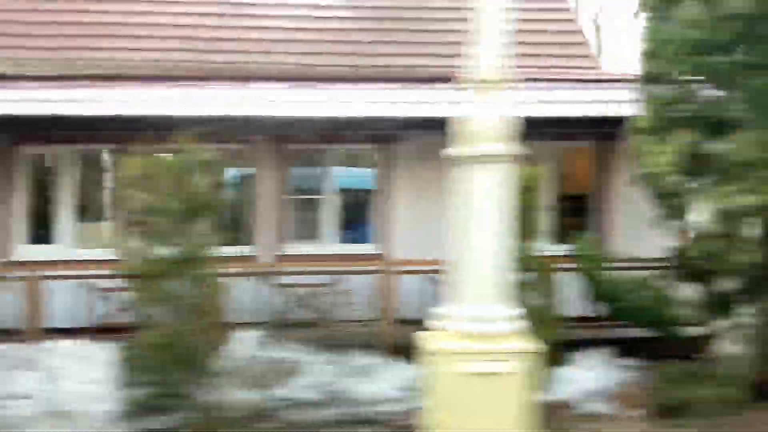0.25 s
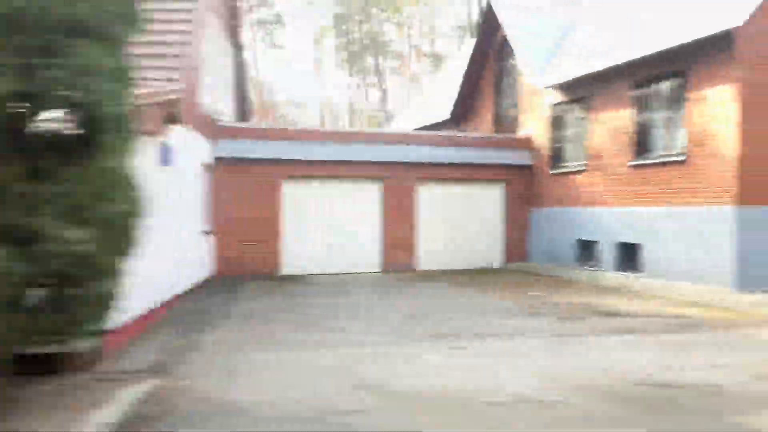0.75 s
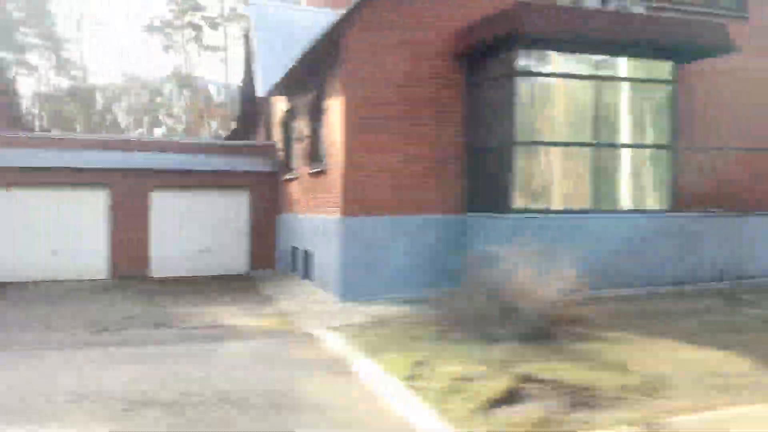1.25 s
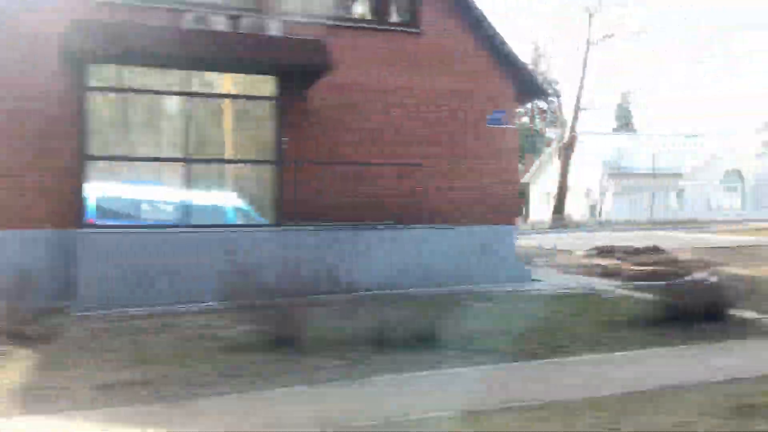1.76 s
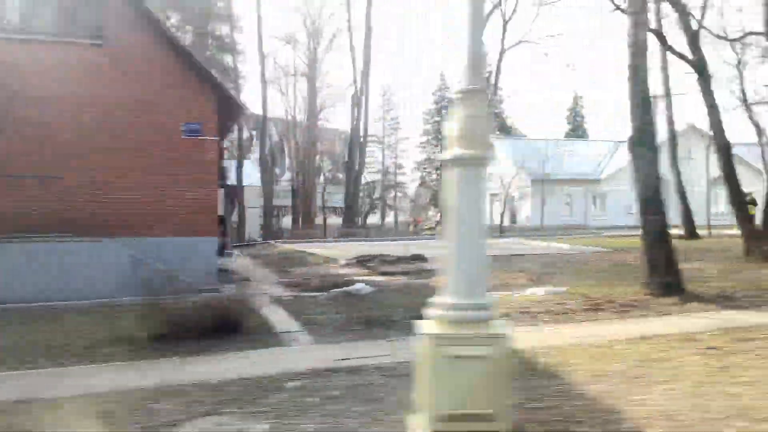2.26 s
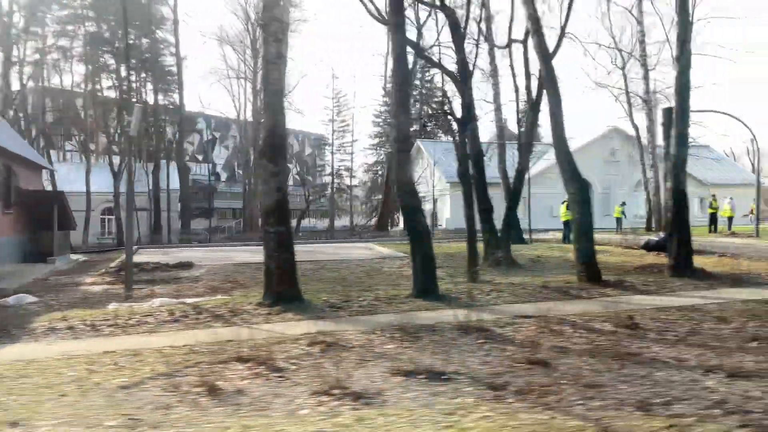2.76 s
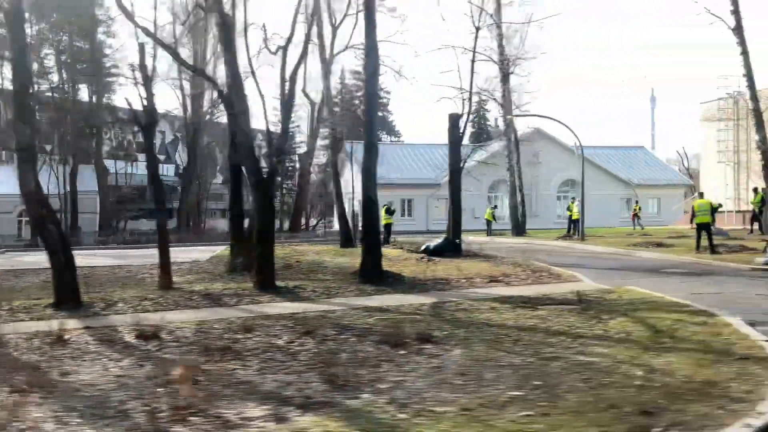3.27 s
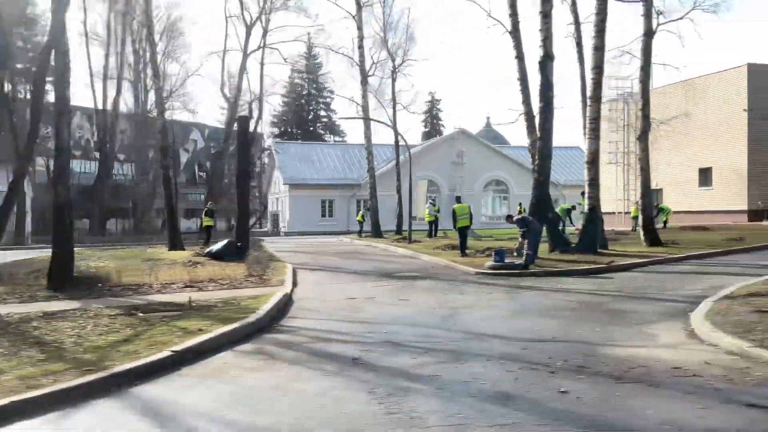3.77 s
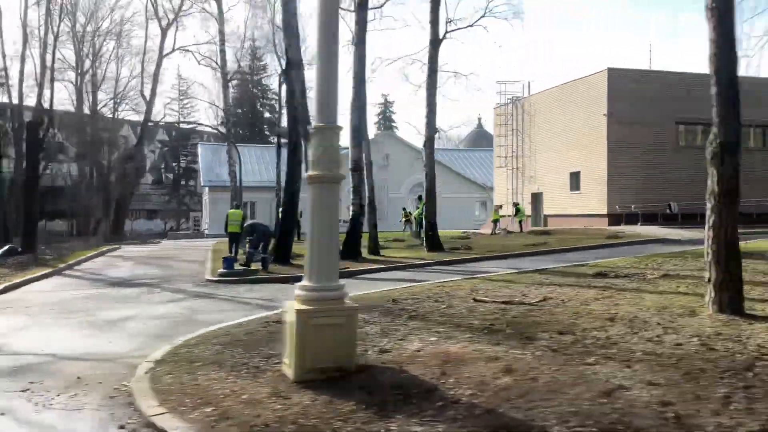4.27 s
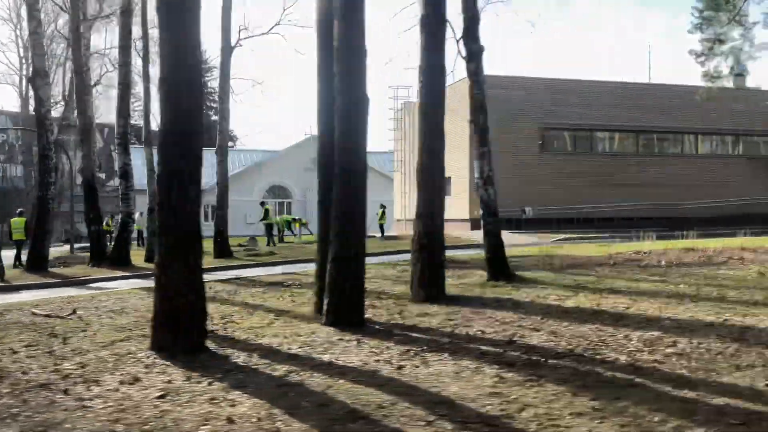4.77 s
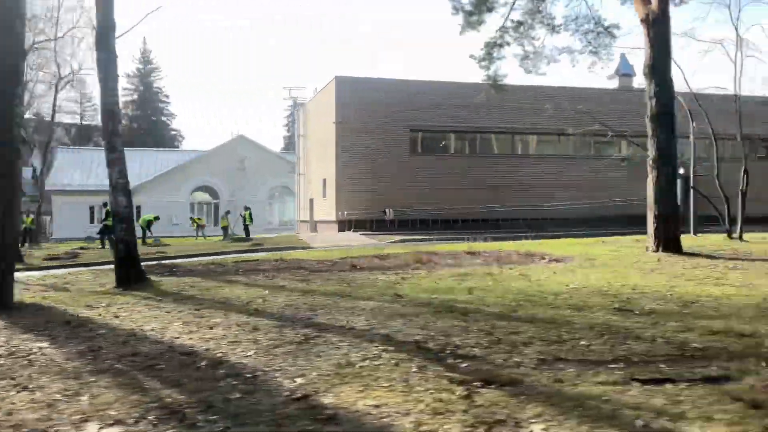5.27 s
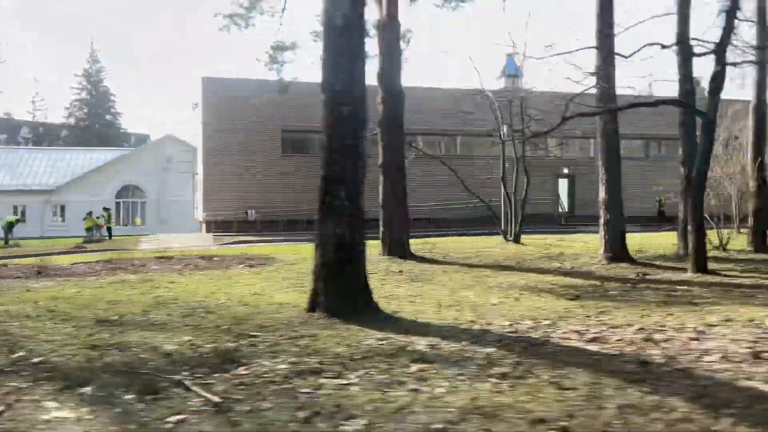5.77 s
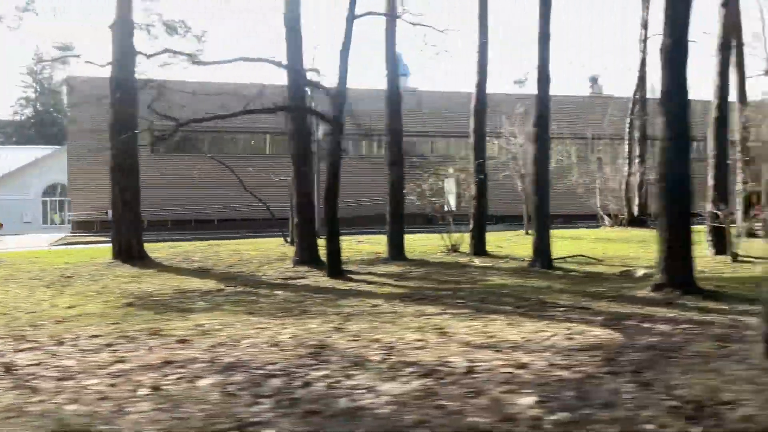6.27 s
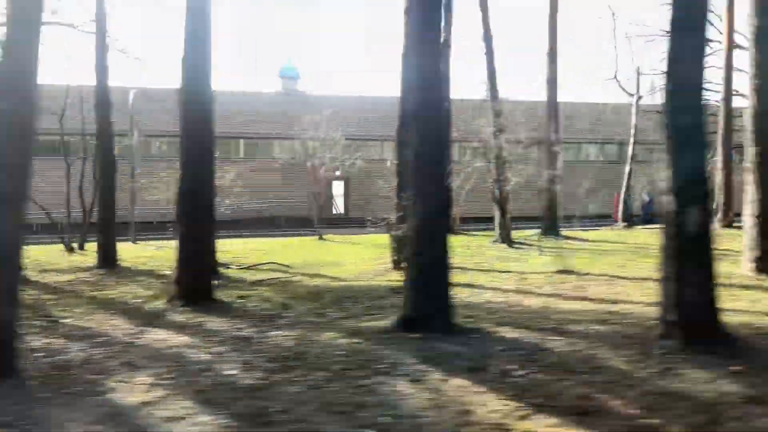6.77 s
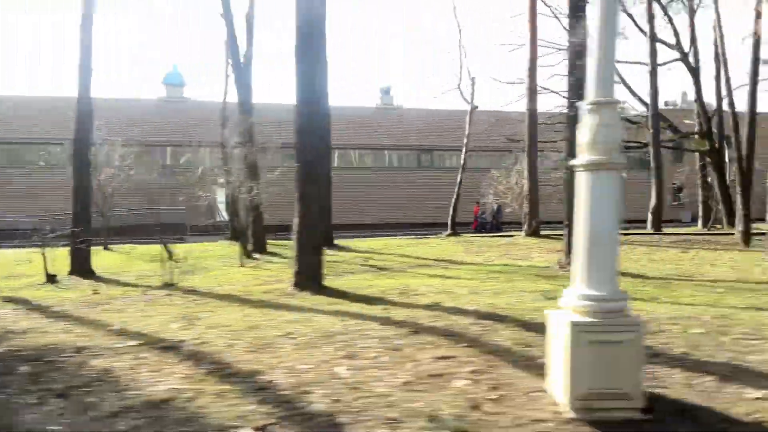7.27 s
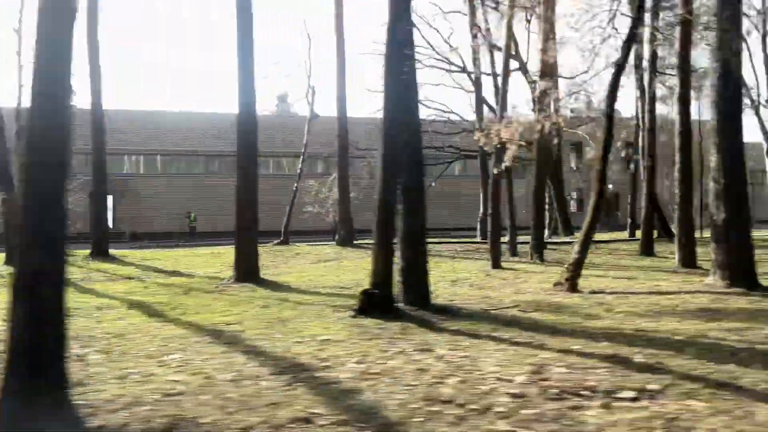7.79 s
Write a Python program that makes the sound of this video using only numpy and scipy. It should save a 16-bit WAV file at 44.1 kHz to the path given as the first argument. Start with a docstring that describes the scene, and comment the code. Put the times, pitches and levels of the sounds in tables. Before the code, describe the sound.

A handheld phone microphone in a bus cabin picks up continuous bassy rumble, a droning hum and a dull, faintly singing roar with very faint hiss. Small jolts thump in the first three seconds. Ticks thicken after four seconds, leading to hard bumps and a loose object knocking against a panel. Then a slight squeak and metal rattle, and smoother, softer rolling as the bus slows.

```python
"""Inside a slowing bus

A bus rolls along a quiet road, losing speed, heard by a phone held near a side window. Road roughness booms in
the body as shaped noise, bumps jolt it as short unsteady tones, and the driveline hums on multiples of the shaft
rate. Tyres and air roar as flickering noise with panels resonating in it, under a steady hiss. Trim ticks, rustles
and squeaks; a loose object knocks and bounces, and a metal fitting chatters, both as struck modes and noise.
"""
import sys
import numpy as np
from scipy import signal
from scipy.fft import rfft, irfft, next_fast_len
from scipy.io import wavfile

SR = 44100
rng = np.random.default_rng(int(sys.argv[2]) if len(sys.argv) > 2 else 0)


def int16_out(signal):
    """Quantize to a 16-bit WAV file."""
    q = np.round(np.clip(np.atleast_2d(signal).T, -1, 1) * 32767)
    wavfile.write(sys.argv[1], SR, q.astype(np.int16))


N = 354123
M = next_fast_len(N)
FREQ = np.arange(M // 2 + 1) * SR / M
TIME = np.arange(N) / SR
AFTER = np.arange(SR // 3) / SR  # time since a blow, s
PORT_LAG_S = 24 / 44100  # sound reaches the left microphone port this much later
TRIM_LEAD_S = 23 / 44100  # ticks and knocks reach the left port this much earlier


def undb(db):
    """Gain of a level in dB."""
    return 10 ** (np.asarray(db) / 20)


def columns(table):
    """Curve rows joined by straight lines over time, one array a column."""
    s, *cols = np.transpose(table)
    return [np.interp(TIME, s, c) for c in cols]


def unit(x):
    """Scale so that the mean of both channels has rms 1."""
    return x / np.sqrt(np.mean(x.mean(axis=0) ** 2))


def power(spectrum):
    """Energy of the mean of both channels."""
    return np.sum(np.abs(spectrum.mean(axis=0)) ** 2)


def walk(rate):
    """Random levels of spread 1 met every 1 / rate s and joined smoothly."""
    knots = rng.standard_normal(int(N / SR * rate) + 3)
    k, part = np.divmod(TIME * rate, 1)
    k = k.astype(int)
    ease = (1 - np.cos(np.pi * part)) / 2
    return knots[k] * (1 - ease) + knots[k + 1] * ease


def noise(grain_db=0., size=100):
    """Spectra of two unrelated noises; grain makes their shared level jump every `size` samples."""
    level_db = grain_db * rng.standard_normal(M // size + 1)
    return rfft(rng.standard_normal((2, M)) * undb(level_db).repeat(size)[:M])


def field(colour, lag_s, drive):
    """Coloured noise at both ports: the left hears the right's sound delayed, mixed with sound of its own."""
    hz, *cols = np.transpose(colour)
    db, pan_db, like, turn = (np.interp(np.log(FREQ + 1), np.log(hz), c) for c in cols)
    like = np.clip(like, 0, 1)
    shared, own = drive
    gain = undb(db) * (FREQ > hz[0]) * (FREQ < hz[-1])
    late = shared * np.exp(-1j * (2 * np.pi * FREQ * lag_s + turn))
    left = undb(pan_db) * (np.sqrt(like) * late + np.sqrt(1 - like) * own)
    return gain * np.array([left, shared])


def flicker(spectrum, lo_hz, count, slow_db, quick_db, rate, tilt_db=0.):
    """Half-octave bands, each wandering slowly and quickly on its own; tilt is in dB per octave."""
    out = 0
    for octave in np.arange(count) / 2:
        band = np.cos(np.pi * np.clip(np.log2(FREQ / lo_hz + 1e-9) - octave, -.5, .5)) ** 2
        # the tilt turns a quarter octave above the middle band
        db = slow_db * walk(1) + quick_db * walk(rate) + tilt_db * (octave - count / 4)
        out = out + irfft(spectrum * band, M)[:, :N] * undb(db)
    return unit(out)


def ring(hz, t60):
    """A dying sine that takes about a cycle to build up."""
    decay = np.exp(-np.log(1000) * AFTER / t60)
    return np.sin(2 * np.pi * hz * AFTER) * decay * (1 - np.exp(-AFTER * hz))


def clatter(hz, width, t60):
    """A dying burst of noise around one pitch, partly different at the two ports."""
    band = signal.butter(2, [hz - width / 2, hz + width / 2], "band", fs=SR, output="sos")
    both, apart = signal.sosfilt(band, rng.standard_normal((2, len(AFTER))))
    sides = np.array([both + 0.88 * apart, both - 0.78 * apart]) / (2 * both.std())
    return sides * np.exp(-np.log(1000) * AFTER / t60)


def add(out, s, sound, pan_db, lead_s=0):
    """Place a short sound at both ports; with a lead the left is early and their mean keeps the sound's peak."""
    pair = undb([[pan_db / 2], [-pan_db / 2]]) * sound
    pair[1] = np.roll(pair[1], round(lead_s * SR))
    if lead_s:
        pair *= np.abs(sound).max() / np.abs(pair.mean(axis=0)).max()
    i = int((s - lead_s) * SR)
    out[:, i:i + pair.shape[1]] += pair[:, :N - i]


def road():
    """The rough surface shakes floor, sides and roof, each booming in its own range."""
    # roughness of the surface: start_s, roughness_db
    roughness = [(0, -24.5), (.35, -30.5), (1, -21.5), (1.5, -26.5), (2, -28), (3, -30), (3.7, -30),
                 (4.3, -25), (4.7, -23), (5.05, -25), (5.55, -21), (5.66, -28.5), (6, -30.5), (6.5, -33.5),
                 (7.2, -31), (8.03, -35)]
    # booms of floor, sides and roof, each: pitch_hz, right_db_per_hz (relative), left_minus_right_db,
    # likeness (0-1), left_lag_rad (beyond the port spacing)
    floor_boom = [(15, -42, 1, .95, 0.0059), (30.2, -14.5, 0, 1, 0), (44.8, -7, -2, 0.87, 0),
                  (65.6, 0.5, 0, 0.6, 0.0015), (85, -8, -1.5, 0.2, 0), (99, -30.5, 2, 0.3, 0.0031)]
    side_boom = [(65.4, -23.5, 0, 0.3, 0.0031), (77.6, -6.5, -0.69, 0.24, 0.00023),
                 (97.5, -0.5, -0.097, 0.17, 0), (111.7, -8, 0.86, 0.77, 0), (143, -27, 0.99, 0.52, 0)]
    roof_rumble = [(111, -28, 3.5, .4, 0.0075), (125.5, -2.5, 5.5, 0.21, 0.012), (147, -1, -5, 0.62, 0.18),
                   (166, -6, 0, 0.99, 0.099), (205.5, -10, -3.5, 0.18, 0.037), (260.3, -3, -7, 0.17, 0.004),
                   (315.8, -14, 4.5, 0.081, 0.19), (317, -20, -1, 0.092, 0.1), (378, -27, -3, .1, 0.024)]
    # answer of floor, sides and roof: level_db (re mean roughness), follow_db_per_db, wander_db
    answers = [(-4, 0.64, 2), (-1.7, 0.94, 2), (-3.5, 0.55, 2.5)]
    mean_db = -28
    rough_db, = columns(roughness)
    out = 0
    for colour, (db, follow, wander_db) in zip((floor_boom, side_boom, roof_rumble), answers):
        # the analytic signal gives the envelope of the swing
        swing = np.fft.ifft(field(colour, PORT_LAG_S, noise()), M)[:, :N]
        # a ringing body swings more evenly than raw noise
        swing = swing / (np.abs(swing).mean(axis=0) + .3 * np.std(swing)) ** .45
        level_db = mean_db + db + follow * (rough_db - mean_db) + wander_db * walk(8)
        out = out + unit(swing.real) * undb(level_db)
    return out


def jolts():
    """Bumps under the wheels throw floor and side panels, each on one low pitch that is never quite steady."""
    # bumps: centre_s, length_s, floor_peak_db, side_peak_db
    bumps = [(0.063, 0.14, -40, -26), (0.546, 0.043, -29, -24), (0.82, 0.089, -31, -21),
             (1.044, 0.036, -17, -15.5), (1.279, 0.11, -38, -16.5), (1.452, 0.046, -19, -17),
             (1.844, 0.12, -42, -21), (2.347, 0.067, -26, -38), (2.666, 0.046, -37, -19.5),
             (2.738, 0.044, -19, -31), (3.195, 0.055, -38, -21.5), (4.178, 0.07, -25, -29),
             (4.857, 0.093, -29, -12.5), (4.923, 0.12, -22.5, -34), (4.694, 0.086, -30, -20.5),
             (5.176, 0.06, -21, -17.5), (5.276, 0.093, -19, -23), (5.443, 0.049, -15.5, -16),
             (5.495, 0.035, -10, -17.5), (5.342, 0.096, -24, -35), (5.055, 0.11, -23, -35),
             (5.56, 0.037, -21, -19), (6.095, 0.076, -24.5, -24.5), (7.187, 0.099, -39, -25)]
    # ringing of floor and sides: pitch_hz, pitch_wander (share), left_lag_rad, lag_wander_rad
    jolt_tones = [(60, 0.13, 0.2, 0.25), (95.2, 0.0704, 0.3, 0.58)]
    centres, lengths, *peaks = np.transpose(bumps)
    out = 0
    for peaks_db, (hz, wander, lag, lag_wander) in zip(peaks, jolt_tones):
        gain = sum(swell(s, length, db) for s, length, db in zip(centres, lengths, peaks_db))
        phase = 2 * np.pi * (np.cumsum(hz * (1 + wander * walk(14))) / SR + rng.random())
        out = out + gain * np.sin([phase - lag - lag_wander * walk(6), phase])
    return out


def swell(s, length, db):
    """Gain of one jolt centred on s: it rises, holds and falls."""
    edge_s = 0.018
    inside = np.clip((length / 2 - np.abs(TIME - s)) / edge_s + .5, 0, 1)
    return undb(db) * np.sin(np.pi / 2 * inside) ** 2


def driveline():
    """Engine and driveline hum on multiples (orders) of the shaft rate, wavering in level and a little in phase."""
    # orders with a level curve each: start_s, hum_hz (11 times the shaft rate), then hum_db, order_8_db,
    # order_33_db, order_4_db, order_16_db, order_7_db
    shaft = [(0, 273.2, -33.5, -43.5, -65, -31.5, -48, -49), (1, 271, -32, -39, -65, -34.5, -45, -47.5),
             (2, 268.9, -30, -39.5, -65, -30, -47.5, -44.5), (3, 265.5, -33, -43, -53, -31.5, -54.5, -46.5),
             (4, 264.1, -34, -41.5, -54.5, -34.5, -52, -42.5), (5, 262.8, -33, -42.5, -56.5, -33, -60, -45),
             (5.4, 262.2, -37.5, -36.5, -61, -39, -57, -42),
             (5.52, 260.7, -30.5, -42.5, -51, -33.5, -52, -49),
             (6.2, 259.4, -35, -38.5, -47, -41.5, -58, -51), (7, 256.7, -37, -41.5, -47.5, -38, -55, -49),
             (8.03, 254.1, -40, -34.5, -46.5, -46, -59, -47)]
    # stereo of those six, in that order: left_minus_right_db, left_lag_rad
    curve_sides = [(-6, 0.24), (3, 2), (-7.5, 3.5), (3, 0.1), (-3.5, 2), (2, 1.3)]
    # level waver of those six: waver_db
    curve_waver = [1.9, 2.2, .6, 2, 1.1, 2]
    # orders whose level changes evenly: order, start_db, change_db_per_s, left_minus_right_db, left_lag_rad
    even = [(1.992, -42, 0, -1, 0.05), (6.04, -42, 0, 3.5, 0.55), (12, -45.5, 0, 5, 1.0),
            (23.18, -51.5, -1.5, -10, 2.9), (27.62, -56.5, -1, -4.5, 3.5)]
    even_waver_db = 2
    hum_hz, *curves_db = columns(shaft)
    turns = 2 * np.pi * np.cumsum(hum_hz / 11) / SR
    lines = [(order, db, waver_db, *side)
             for order, db, waver_db, side in zip((11, 8, 33, 4, 16, 7), curves_db, curve_waver, curve_sides)]
    lines += [(order, db + slope_db * TIME, even_waver_db, *side) for order, db, slope_db, *side in even]
    out = 0
    for order, db, waver_db, pan_db, lag in lines:
        phase = order * turns + 2 * np.pi * rng.random() + 0.42 * walk(5)
        sides = np.array([undb(pan_db / 2) * np.sin(phase - lag), undb(-pan_db / 2) * np.sin(phase)])
        out = out + unit(sides) * undb(db + waver_db * walk(7))
    return out


def roar():
    """Tyre and air noise comes through the cabin, with panel resonances singing in it."""
    # course of the roar: start_s, level_db, brightness_db_per_octave
    course = [(0, -39, 1), (.8, -39, 1.24), (2, -39, 1.5), (3, -39, 1.9), (3.8, -39.5, 1.2),
              (4.3, -40, 0.5), (4.9, -40.5, -0.95), (5.4, -38.5, -0.6), (5.8, -40.5, 1), (7, -40.5, 1.04),
              (8.03, -40.5, 1)]
    # cabin colour: pitch_hz, right_db_per_hz (relative), left_minus_right_db, likeness (0-1),
    # left_lag_rad (beyond the port spacing)
    cabin = [(266, -30.5, -8, .2, 0), (340.5, 1, -4, 0.36, 1.1), (390, 2.5, -9.5, 0.41, 0.52),
             (513, 2, -6, 0.2, 0.72), (594, 2, -8, 0.5, 1.5), (793, 0.5, -5, 0.81, 0.89),
             (899, -13.5, -4, 0.27, 0.5), (970, -20.5, 5, .2, 0.72), (1330, -15.5, -5.5, 0.11, 0.15),
             (1780, -15.5, -1.5, 0.14, -0.93), (2020, -24, -0.5, 0.054, 0.55),
             (2966, -22.5, -1.5, 0.11, -0.92), (3930, -35.5, -2.5, 0.21, 0.54), (4500, -42.5, 4, .3, 0.55)]
    # panels: pitch_hz, width_hz (at half amplitude), level_db (re cabin noise), left_minus_right_db,
    # left_lag_rad (beyond the port spacing)
    panels = [(440.5, 20, -9, -14, 1.2), (579.6, 18, -17, -1, 2), (675.3, 21, -13, -10.5, 0.22),
              (1300, 51, -29, -5.5, 0), (1607, 314, -14.5, -8.5, -0.52), (1604, 90, -25, -7, -0.2),
              (1779, 110, -25.5, -6, -0.51), (2145, 37, -29.5, -2, -0.19), (2240, 65, -28.5, -6.5, -0.078),
              (3080, 44, -29.5, -2.5, 0.6), (3458, 110, -22.5, -2.5, -0.14), (3550, 70, -30.5, -3, -0.2),
              (3753, 140, -26, -1, 0.19), (3900, 91, -36.5, 2, 0), (4080, 82, -35.5, -4, -0.77)]
    # the low panels quieten as speed falls
    fade_below_hz, fade_start_s, fade_length_s, fade_db = 700, 4.5, 1, -5
    level_db, tilt_db = columns(course)
    broad = field(cabin, PORT_LAG_S, noise())
    # grit on the road makes the drive of the panels a little grainy; same columns as the cabin colour
    grit_colour = [(200, 0.0016, 0.0016, 0.76, 0.0016), (6000, 0.0029, 0.0079, 0.82, 0.0044)]
    grit = field(grit_colour, PORT_LAG_S, noise(grain_db=2.0))
    total = broad / np.sqrt(power(broad))
    low = np.zeros_like(broad)
    for hz, width, db, pan_db, turn in panels:
        near = np.abs(FREQ - hz) < 4 * width
        resonance = 1 / (1 + 1j * (FREQ[near] - hz) / (width / 2)) ** 2
        sides = np.array([[undb(pan_db) * np.exp(-1j * turn)], [1]])
        song = grit[:, near] * resonance * sides
        target = low if hz < fade_below_hz else total
        target[:, near] += song * undb(db) / np.sqrt(power(song))
    fade = undb(fade_db * np.clip((TIME - fade_start_s) / fade_length_s, 0, 1))
    fading = unit(irfft(low, M)[:, :N]) * np.sqrt(power(low)) * fade
    steady = flicker(total, 271, count=9, slow_db=-0.7, quick_db=1.05, rate=10, tilt_db=tilt_db)
    return (steady + fading) * undb(level_db)


def knocks():
    """A loose object knocks and bounces on a panel, ringing its modes and setting loose parts buzzing."""
    # blows: start_s, ring_peak_db (before buzz is mixed in), hardness (0-1)
    blows = [(5.322, -38, 0.5), (5.3275, -27.5, 0.95), (5.347, -17, 0.14), (5.395, -14, 0.08),
             (5.3299, -24.5, 0.47), (5.342, -31, .5), (5.356, -34, .45), (5.369, -33, .45),
             (5.431, -40, .6), (5.456, -35, 0.6), (5.47, -38, .45), (5.526, -35, .45)]
    # panel modes: pitch_hz, level_db (relative), t60_s
    panel_modes = [(188.2, 0, 0.073), (300, -10, 0.089), (485, -1.5, 0.1), (820, -9, 0.074),
                   (1310, -6, 0.03), (1870, -8, 0.023), (2500, -6.5, .015), (3400, -14, 0.0089),
                   (4940, -2, 0.005), (6230, -8, 0.011), (8100, -3, 0.0045), (10500, -22, .004),
                   (12800, -2, 0.0055)]
    # loose parts: pitch_hz, width_hz, level_db (re ring, before hardness), t60_s
    loose_parts = [(600, 560, 0.5, 0.093), (1290, 780, -7.5, 0.36), (2320, 1000, -9.5, 0.1),
                   (3940, 1500, -11, 0.078), (6200, 950, -21.5, 0.11), (10500, 5000, -24, 0.044)]
    out = np.zeros((2, N))
    for s, db, hard in blows:
        # a softer contact pushes longer and leaves the high modes quiet
        corner_hz = 9000 * hard ** 1.4
        body = sum(undb(g) * ring(hz, t60) / (1 + (hz / corner_hz) ** 4) for hz, g, t60 in panel_modes)
        # a hard one also sets nearby loose parts buzzing
        buzz = sum(undb(g) * clatter(hz, width, t60) for hz, width, g, t60 in loose_parts)
        add(out, s, undb(db) * (body / np.abs(body).max() + hard ** 2 * buzz), -4.5, TRIM_LEAD_S)
    return out


def ticks():
    """Trim ticks: each blow catches the modes a little differently, strongest near one pitch."""
    # blows: start_s, peak_db, pitch_hz (the one that stands out)
    blows = [(0.0932, -51, 5280), (0.6325, -51, 6470), (0.6799, -54, 4550), (0.8006, -54, 4440),
             (0.9204, -54, 5090), (0.9547, -45, 5390), (2.3284, -56, 4440), (3.249, -52, 4490),
             (3.6924, -53, 4656), (4.0926, -49, 4750), (4.1445, -47, 4500), (4.2976, -49, 5690),
             (4.4737, -47, 5028), (4.6284, -54, 4930), (4.6892, -53, 4450), (4.7573, -53, 5420),
             (4.8244, -51, 4402), (4.8293, -48, 5640), (4.8704, -52, 4570), (4.8894, -52, 4900),
             (4.9955, -47, 5010), (5.0074, -50, 6580), (5.0384, -50, 6300), (5.0536, -49, 6970),
             (5.0709, -49, 5410), (5.0934, -51, 4740), (5.1123, -49, 4530), (5.1244, -51, 6300),
             (5.1766, -44, 5570), (5.2594, -47, 5030), (5.3496, -43, 5050), (5.3714, -43, 4990),
             (5.4184, -48, 5770), (5.4364, -45, 5220), (5.4564, -46, 4550), (5.4874, -43, 5810),
             (5.5218, -39, 5500), (5.5623, -50, 4410), (5.6054, -53, 6320), (5.6141, -53, 5970),
             (5.7339, -51, 6060), (6.0114, -50, 5600), (7.5088, -50, 6543)]
    # trim modes: pitch_hz, level_db (relative), t60_s
    trim_modes = [(4600, 3, 0.005), (5340, 2.5, 0.007), (5900, 0.5, 0.006), (6500, 0, .006),
                  (7200, -7.5, .005), (8600, -17, .004), (11500, -20, .004)]
    focus_db, scatter_db = 20.5, 0.5  # focus: dB lost per octave away from the pitch
    out = np.zeros((2, N))
    for s, peak_db, pitch_hz in blows:
        sound = 0
        for (hz, db, t60), (u, v) in zip(trim_modes, rng.standard_normal((len(trim_modes), 2))):
            mode_db = db + scatter_db * u - focus_db * abs(np.log2(hz / pitch_hz))
            sound = sound + undb(mode_db) * ring(hz * (1 + 0.027 * v), t60)
        add(out, s, undb(peak_db) * sound / np.abs(sound).max(), -6.5, TRIM_LEAD_S)
    return out


def chinks():
    """A metal fitting chatters: each contact rings its modes, roughened by noise, over a broad scrape."""
    # contacts: start_s, gain_db
    contacts = [(6.341, -62), (6.351, -52), (6.361, -56), (6.371, -54), (6.381, -60)]
    # fitting modes: pitch_hz, level_db (relative), t60_s
    fitting_modes = [(4330, -1, .06), (4700, -8, .05), (6250, -2.5, .05), (7040, -8, 0.0706),
                     (11640, -8, .06), (15150, -19, .05)]
    # scrape: pitch_hz, width_hz, level_db (relative), t60_s
    scrape_bands = [(5000, 2600, 0, .04), (8500, 3500, -9, .04), (12980, 3000, -19, .04)]
    rough_hz = 160  # width of the noise around each mode
    out = np.zeros((2, N))
    for s, db in contacts:
        sound = sum(undb(g) * clatter(hz, width, t60) for hz, width, g, t60 in scrape_bands)
        for (hz, g, t60), (u, v) in zip(fitting_modes, rng.standard_normal((len(fitting_modes), 2))):
            tone = ring(hz * (1 + .003 * v), t60)
            sound = sound + undb(g + 3.3 * u) * (tone + 1.1 * clatter(hz, rough_hz, t60))
        add(out, s, undb(db) * sound, -2)
    return out


def squeaks():
    """Rubbing trim sings a short, thin, unsteady glide."""
    # glides: start_s, length_s, from_hz, to_hz, level_db
    glides = [(0.165, 0.13, 7100, 5970, -69), (6.222, .03, 3750, 3910, -56)]
    out = np.zeros((2, N))
    for s, length, from_hz, to_hz, db in glides:
        part = np.arange(int(length * SR)) / (length * SR)
        hz = (from_hz + (to_hz - from_hz) * part) * (1 + 0.011 * walk(150)[:len(part)])
        gain = undb(db + 2.8 * walk(90)[:len(part)]) * np.sin(np.pi * part)
        add(out, s, gain * np.sin(2 * np.pi * np.cumsum(hz) / SR), -3)
    return out


def rustle():
    """Loose trim rustles as grainy noise, brought up when the body is shaken."""
    # rustle colour: pitch_hz, right_db_per_hz (relative), left_minus_right_db, likeness (0-1), left_lag_rad
    colour = [(800, -10, 2, .3, 0.0055), (1200, 17, 0.5, .3, 0.004), (2500, 5.5, 0.5, 0.4, 0.0073),
              (4500, -0.5, 1, 0.4, 0.00036), (6400, 5, -8, 0.4, 0.008), (8040, -3, -3, 0.4, 0.0057),
              (9500, -8.5, 2.5, .9, 0.0018), (11100, -16, -1, 0.92, 0.0052), (14000, -23, 1, 0.97, 0.0032),
              (15500, -42.5, 1.5, 0.91, 0.0042)]
    spectrum = field(colour, 0, noise(grain_db=1.5, size=200))
    # levels are those of the part above 7.5 kHz
    treble_share = power(spectrum[:, FREQ > 7500]) / power(spectrum)
    return unit(irfft(spectrum, M)[:, :N]) / np.sqrt(treble_share) * shaking()


def shaking():
    """Gain of the rustle: restless all along, and each shake rises fast, holds and dies away."""
    # resting rustle: start_s, level_db (above 7.5 kHz)
    resting = [(0, -85), (1.3, -80), (2, -89), (4.4, -83), (5.0, -74.5), (5.6, -79), (6.4, -76),
               (6.65, -84), (7.1, -77.5), (8.03, -90)]
    # shakes: start_s, length_s, level_db (above 7.5 kHz)
    shakes = [(.06, .1, -80), (.62, .06, -75), (1.631, .08, -74.5), (2.177, .04, -77), (2.311, 0.028, -75),
              (3.24, .07, -76.5), (3.85, .06, -80), (4.471, .05, -78), (4.747, .08, -72),
              (4.985, .13, -69.5), (5.209, 0.25, -67.5), (5.327, 0.28, -68.5), (5.729, 0.079, -76),
              (5.965, 0.061, -72), (6.134, .06, -73), (6.33, 0.047, -70), (6.769, .04, -75),
              (7.237, 0.012, -75), (7.502, 0.03, -68.5), (7.682, 0.045, -81), (7.86, 0.049, -76)]
    attack_s, release_s, wander_db = 0.009, 0.014, -1
    gain = undb(columns(resting)[0] + wander_db * walk(11))
    for s, length, db in shakes:
        rise = np.clip((TIME - s) / attack_s, 0, 1)
        # half the length delays the fall, and half slows it
        fall = np.exp(-np.clip(TIME - s - length / 2, 0, None) / (release_s + length / 2))
        gain = np.hypot(gain, undb(db) * rise * fall)
    return gain


def hiss():
    """Air hisses at the window as a faint, gently flickering treble noise."""
    # air colour: pitch_hz, right_db_per_hz (relative), left_minus_right_db, likeness (0-1), left_lag_rad
    colour = [(3630, -22, 0.5, .3, 0.0035), (4260, 3, 0, .4, 0.0038), (5270, -2, -0.5, .2, 0.0033),
              (6460, 2.5, -6.5, 0.36, 0.0075), (7460, -7, -3.5, .3, 0.0024), (9050, -16, 0.5, 0.3, 0.0012),
              (9740, -18.5, 0, 0.89, 0.0033), (11000, -40, -3.5, 0.94, 0.0039),
              (15500, -35, 2, 0.94, 0.0043)]
    air = field(colour, 0, noise())
    return flicker(air, 4000, count=5, slow_db=0.7, quick_db=1.5, rate=11) * undb(-66.5)


def scene():
    """Everything heard in the cabin."""
    body = road() + jolts() + driveline() + roar()
    small_things = knocks() + ticks() + chinks() + squeaks()
    return body + small_things + rustle() + hiss()


def record(dry):
    """The phone cuts the top with a steep low-pass; the sound comes in over 2 ms."""
    top_hz = 15570
    cut = signal.ellip(8, .2, 70, top_hz, fs=SR, output="sos")
    return signal.sosfilt(cut, dry * np.clip(TIME / .002, 0, 1))


dry = scene()
out = record(dry)
int16_out(out)
```